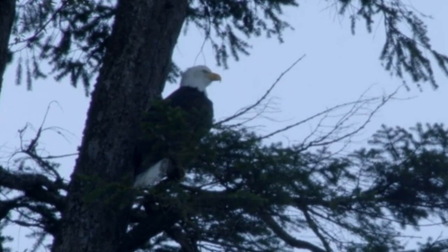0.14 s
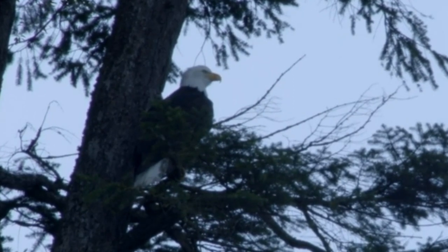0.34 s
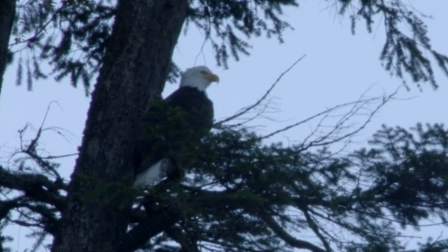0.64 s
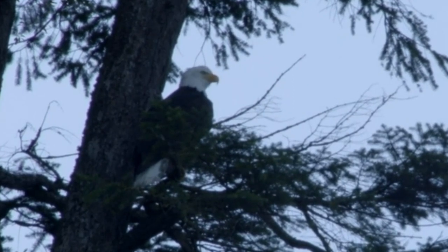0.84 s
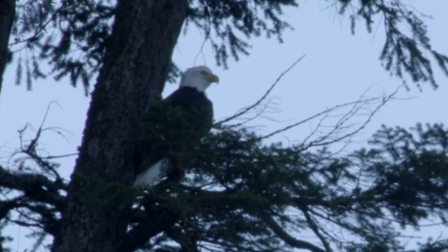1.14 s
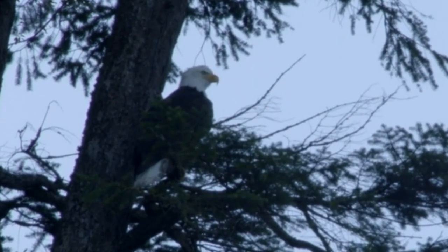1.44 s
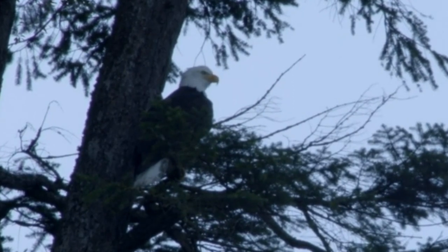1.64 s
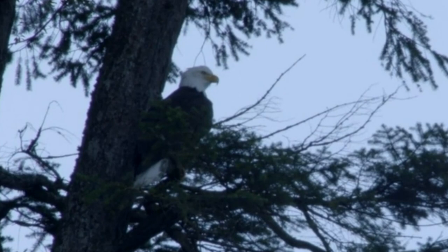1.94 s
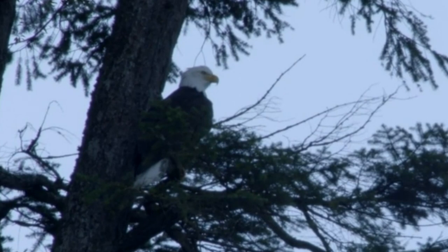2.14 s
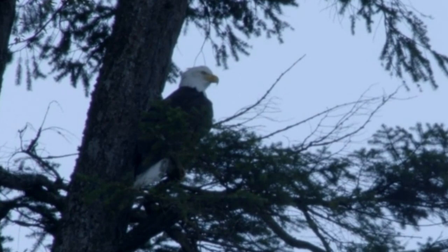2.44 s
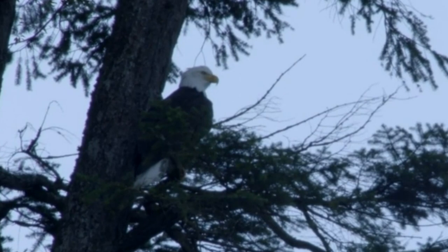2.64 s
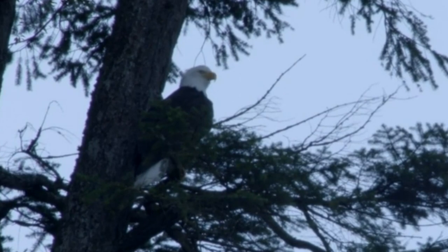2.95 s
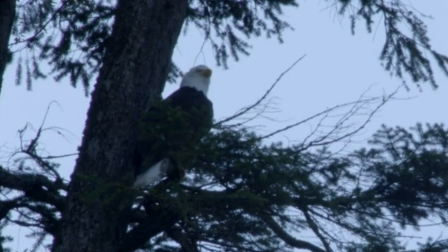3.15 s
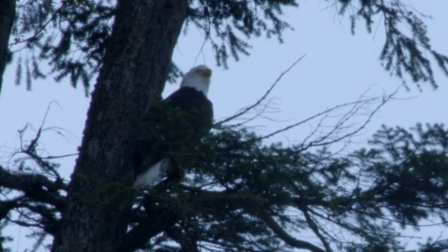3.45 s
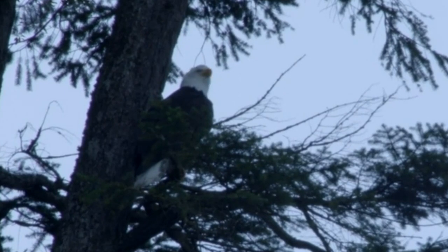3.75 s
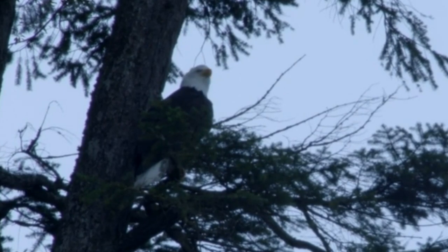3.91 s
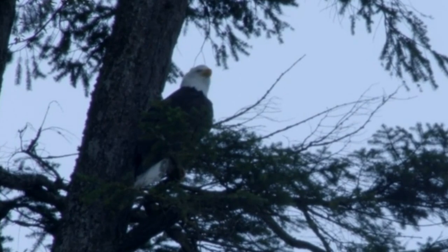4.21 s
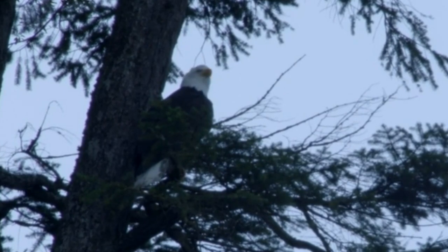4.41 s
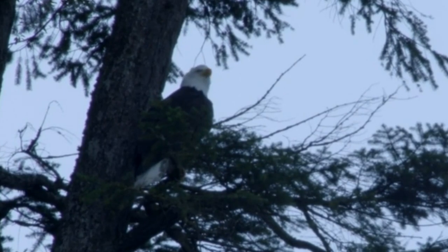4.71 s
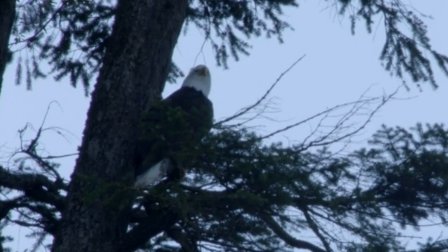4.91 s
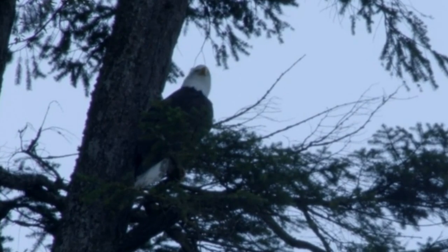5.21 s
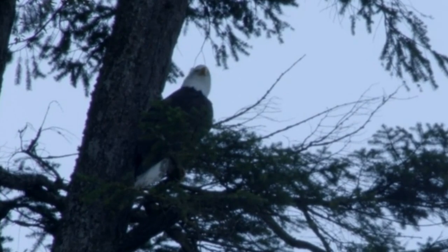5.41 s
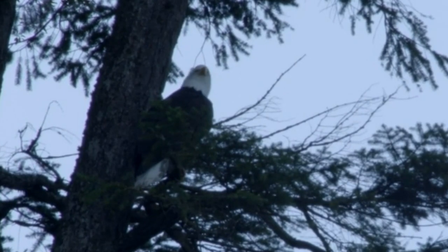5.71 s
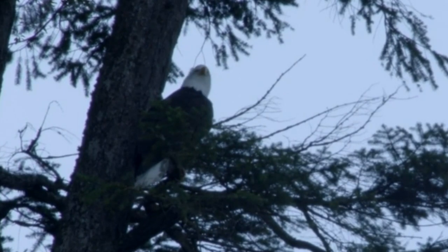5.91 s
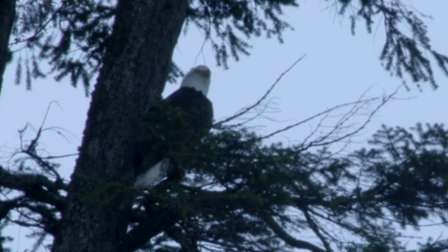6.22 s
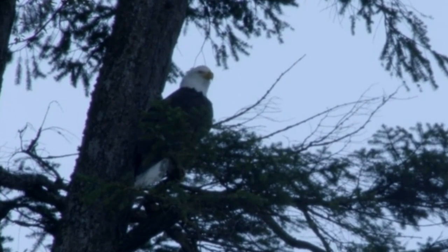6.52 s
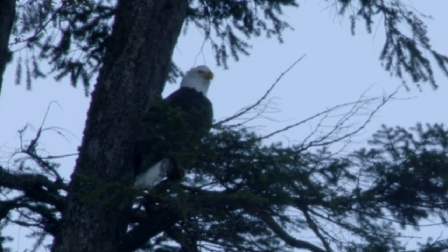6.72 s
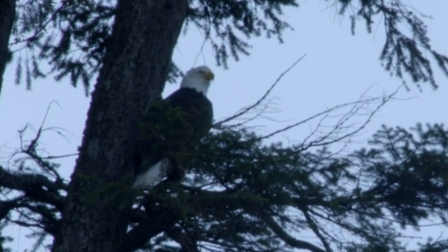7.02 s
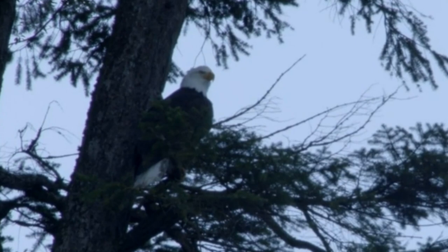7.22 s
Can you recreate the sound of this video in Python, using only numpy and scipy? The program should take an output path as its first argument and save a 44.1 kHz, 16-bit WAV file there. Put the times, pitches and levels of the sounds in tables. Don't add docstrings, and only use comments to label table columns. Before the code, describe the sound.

Quiet dusk woodland with cricket trills, chips and leaf hiss; midway a bird's hoots quicken and an eagle shrieks twice, high and piercing.

```python
import sys
import numpy as np
from scipy import signal
from scipy.fft import rfft, irfft
from scipy.io import wavfile
from scipy.ndimage import uniform_filter1d

SR = 44100
rng = np.random.default_rng(int(sys.argv[2]) if len(sys.argv) > 2 else 0)


def gain_from_db(level_db):
    decades = np.asarray(level_db, float) / 20
    return 10 ** decades


def wav_out(sig):
    wavfile.write(sys.argv[1], SR, np.round(np.clip(np.atleast_2d(sig).T, -1, 1) * 32767).astype(np.int16))


N = 324576
T = np.arange(N) / SR
HZ = np.maximum(np.arange(N // 2 + 1) * SR / N, 1)
SIDES = np.array([[.5], [-.5]])


def unit(x):
    return x / np.sqrt(np.mean(x ** 2))


def walk(rate):
    k = int(SR / rate)
    held = np.repeat(rng.standard_normal(N // k + 1), k)[:N]
    return unit(uniform_filter1d(uniform_filter1d(held, k), k))


def swells(rows):
    return sum(size * np.exp(-((T - s) / length) ** 2) for s, length, size in rows)


def level_swells(rows):
    return swells([(s, length, gain_from_db(db)) for s, length, db in rows])


def band(hz, width):
    return np.exp(-((HZ - hz) / width) ** 2 * 2)


def log_curve(hz, values, *ends):
    return np.interp(np.log(HZ), np.log(hz), values, *ends)


def wide_noise(gain, alike, turn):
    left, other = (rng.standard_normal((2, len(HZ))) + 1j * rng.standard_normal((2, len(HZ)))) * gain
    right = alike * np.exp(1j * turn) * left + np.sqrt(1 - alike ** 2) * other
    return unit(irfft([left, right], N))


def place(x, pan_db, lag_s):
    late = irfft(rfft(x) * np.exp(-2j * np.pi * HZ * lag_s), N)
    return gain_from_db(SIDES * pan_db) * np.array([late, x])


def trees(x, t60, wet_db):
    t = T[:SR // 3]
    tail = rng.standard_normal((2, len(t))) * gain_from_db(-60 * t / t60) * np.clip(t / 0.028, 0, 1)
    tail = unit(tail) / np.sqrt(len(t))
    return gain_from_db(wet_db) * signal.fftconvolve(x[None], tail, axes=1)[:, :N]


def play(rows, wobble):
    s, hz, *columns = np.transpose(rows)
    span = slice(max(int(s[0] * SR), 0), int(s[-1] * SR))
    pitch = uniform_filter1d(np.interp(T[span], s, hz), int(.0021 * SR))
    phase = 2 * np.pi * np.cumsum(pitch * (1 + wobble[span])) / SR
    columns = [np.interp(T[span], s, c) for c in columns]
    edge = np.clip(np.minimum(T[span] - s[0], s[-1] - T[span]) / .002, 1e-3, 1)
    return span, phase, [columns[0] + 20 * np.log10(edge), *columns[1:]]


def notes(events, hz, shape, vary, rough):
    out = np.zeros(N)
    wobble, flutter = rough * .03 * walk(250), 1 + rough * walk(150)
    jogs = rng.standard_normal(len(events))
    for (s, db), top_hz, jog in zip(events, np.broadcast_to(hz, len(events)), jogs):
        rows = [(s + a, top_hz * ratio * (1 + vary * jog), db + d) for a, ratio, d in shape]
        span, phase, (env,) = play(rows, wobble)
        out[span] += gain_from_db(env) * np.sin(phase)
    return out * flutter


# (time [s], pitch [Hz], level [dB])
RISE = [
    [(4.597, 3300, -50), (4.605, 3000, -43), (4.612, 3350, -38), (4.622, 3660, -38), (4.636, 3790, -33),
     (4.655, 3805, -29), (4.668, 3880, -28), (4.683, 3990, -27), (4.693, 4200, -26.5)],
    [(5.59, 2870, -53), (5.6, 3570, -28.5), (5.62, 4600, -35), (5.632, 5650, -39), (5.64, 5930, -40),
     (5.655, 5710, -31.5)],
]
# (time [s], pitch [Hz], level [dB])
UPPER = [
    [(4.699, 4410, -30), (4.71, 4600, -25), (4.722, 4670, -24.5), (4.735, 4680, -28), (4.785, 4920, -30.5),
     (4.815, 4980, -26.5), (4.821, 4950, -42), (4.825, 5250, -37), (4.834, 4550, -38)],
    [(5.678, 5080, -38), (5.72, 5250, -28.5), (5.76, 5350, -25), (5.786, 5230, -26.5), (5.791, 5200, -39),
     (5.796, 5200, -26), (5.802, 4880, -27)],
]
# (time [s], pitch [Hz], level [dB])
LOWER = [
    [(4.731, 4600, -39), (4.748, 4620, -27), (4.79, 4370, -29), (4.817, 4480, -28), (4.822, 3830, -25),
     (4.828, 3500, -18), (4.833, 2460, -32.5), (4.84, 2400, -37), (4.848, 2680, -36)],
    [(5.655, 4860, -39), (5.672, 4490, -31), (5.69, 4130, -32), (5.72, 4225, -32), (5.76, 4450, -27),
     (5.782, 4500, -28), (5.79, 3930, -20), (5.797, 3250, -26), (5.804, 2510, -22)],
]
# (start [s], length [s], top pitch [Hz], level [dB], share of pitch climbed [0-1])
YELPS = [
    (4.832, 0.019, 3870, -19.5, .14),
    (5.8047, 0.016, 3940, -18, .04),
]
# (share of length [0-1], share of climb still to go [0-1], level [dB])
YELP_SHAPE = [(0, 1., -8), (.3, .3, -1), (.75, 0, -4.5), (1, .1, -15)]
# (centre [s], half length [s], roughness [0-1])
FLUTTER = [
    (4.824, .006, .3),
    (4.842, .008, .15),
    (5.648, 0.02, .65),
    (5.798, 0.011, 0.4),
    (5.812, .007, .1),
]
OCTAVE_TOP_DB = [-55.5, -49, -53.5, -40, -60, -54]
SUM_TONE_DB = [-7.5, 5]


def two_voiced_whistle(wobble, rasp, shake):
    octave_under_db, octave_flutter_db = -7, -21
    yelps = [[(s + a * length, hz * (1 - climb * to_go), db + d) for a, to_go, d in YELP_SHAPE]
             for s, length, hz, db, climb in YELPS]
    upper = [rise + whistle for rise, whistle in zip(RISE, UPPER)]
    flutter = 0.097 + swells(FLUTTER)
    octaves, halves = np.zeros(N), []
    for rows, top_db in zip(upper + LOWER + yelps, OCTAVE_TOP_DB):
        span, phase, (db,) = play(rows, wobble)
        rough = flutter[span]
        swing = np.exp(1j * (phase + 1.5 * rough * shake[span]))
        swing = swing * (1 + 0.55 * rough * rasp[span]) / np.sqrt(1 + rough ** 2)
        half = np.zeros(N, complex)
        half[span] = gain_from_db(db) * swing
        halves.append(half)
        octave_db = np.minimum(db + octave_under_db, top_db) + octave_flutter_db * rough
        octaves[span] += gain_from_db(octave_db) * np.imag(swing ** 2)
    sum_tones = sum(gain_from_db(db) * up * low for db, up, low in zip(SUM_TONE_DB, halves[:2], halves[2:4]))
    return octaves + np.imag(sum(halves) + sum_tones)


# (time [s], pitch [Hz], level [dB])
SCREAM = [
    [(4.848, 3410, -30), (4.853, 3300, -22.5), (4.859, 3220, -17), (4.87, 3140, -17.5), (4.88, 3118, -15),
     (4.906, 3080, -14.5), (4.924, 3033, -13.5), (4.933, 2980, -15), (4.942, 2943, -13.5)],
    [(5.817, 3470, -26), (5.824, 3360, -19.5), (5.834, 3260, -13.5), (5.842, 3250, -13), (5.863, 3205, -9),
     (5.876, 3140, -10.5), (5.894, 3148, -10.5), (5.92, 3128, -12), (5.934, 3100, -13)],
]
# (time [s], pitch [Hz], level [dB])
FALL = [
    [(4.948, 2790, -15), (4.956, 2600, -15), (4.964, 2550, -17), (4.98, 2424, -22.5), (4.985, 2533, -26),
     (4.992, 2390, -19.5), (5.002, 2224, -26.5), (5.012, 2060, -35), (5.024, 1910, -45)],
    [(5.942, 3027, -15), (5.948, 2950, -14.5), (5.954, 2730, -14), (5.961, 2517, -14.5), (5.968, 2430, -19),
     (5.973, 2380, -32), (5.978, 2380, -21), (5.986, 2220, -25.5), (5.996, 1980, -42)],
]
# (octave re pitch [dB], third partial re pitch [dB], pitch under which the period doubles [Hz],
# half pitch re doubling [dB], octave gain as the note sags [dB])
SCREAM_COLOUR = [
    (-25, -39, 2614, -6, 12.3),
    (-18.5, -25.5, 2570, -8, 5.7),
]
OCTAVE_DIP_DB = [-10, 0]
# (delay [s], level [dB])
BRANCHES = [(.009, -12), (.016, -18), (.026, -21), (.039, -26)]


def locked_scream(wobble, rasp, shake):
    early_from_s, early_to_s, early_db = 5.881, 5.949, -19.5
    early = gain_from_db(early_db) * np.clip(np.minimum(T - early_from_s, early_to_s - T) / 0.0054, 0, 1)
    out = np.zeros(N)
    for held, fall, colour, dip_db in zip(SCREAM, FALL, SCREAM_COLOUR, OCTAVE_DIP_DB):
        octave_db, third_db, break_hz, half_db, gain_db = colour
        span, phase, (db, hz) = play([(s, f, d, f) for s, f, d in held + fall], wobble)
        resonance = np.maximum(np.exp(-((hz - 2600) / 230) ** 2), .55 * (hz < 2600))
        dip = np.exp(-((hz - 2940) / 80) ** 2)
        octave_db = octave_db + gain_db * resonance + dip_db * dip
        third_db = third_db - 21.5 * np.abs(3010 - hz) / 1000
        sag = break_hz - hz
        failing = gain_from_db(-12.5 + 16 * sag / 1000) * np.clip(sag / 60, 0, 1)
        unrest = .4 * np.minimum(failing, 1)
        phase = phase + unrest * shake[span]
        half_fade = np.clip((hz - 2150) / 150, .2, 1)
        half = np.sin(3 * phase / 2) + gain_from_db(half_db) * half_fade * np.sin(phase / 2)
        half = half + gain_from_db(-21) * np.sin(5 * phase / 2)
        tone = np.sin(phase) + gain_from_db(octave_db) * np.sin(2 * phase) + gain_from_db(third_db) * np.sin(3 * phase)
        voice = gain_from_db(db) * (1 + unrest * rasp[span]) * (tone + (early[span] + failing) * half)
        direct, turned = np.zeros(N), np.zeros(N)
        direct[span], turned[span] = voice, np.clip((3010 - hz) / 150, 0, 1)
        fall_end_s = fall[-1][0]
        turned = np.maximum(turned, (T > fall_end_s - .01) & (T < fall_end_s + .05))
        out += direct + turned * sum(gain_from_db(d) * np.roll(direct, int(s * SR)) for s, d in BRANCHES)
    return out


def eagle():
    wobble, rasp, shake = .001 * walk(300), walk(900), walk(1500)
    voice = two_voiced_whistle(wobble, rasp, shake) + locked_scream(wobble, rasp, shake)
    top_limit = signal.ellip(8, .2, 50, 11000, fs=SR, output="sos")
    return np.sqrt(2) * signal.sosfilt(top_limit, voice)


# (time [s], peak level [dB])
HOOTS = [(4.478, -42), (4.672, -38.5), (4.871, -33.5), (5.035, -34), (5.19, -32.5), (5.3323, -32.5),
         (5.471, -31.5), (5.613, -31), (5.7416, -30.5), (5.875, -31), (5.9981, -29), (6.118, -29),
         (6.232, -28.5), (6.34, -29.5), (6.448, -29.5), (6.5491, -29), (6.6518, -29.5), (6.752, -30.5),
         (6.8526, -31), (6.9497, -32), (7.0471, -31.5), (7.1359, -48)]
# (time [s], pitch ratio [1], level [dB])
HOOT_SHAPE = [(-.004, 1.22, -9), (.001, 1.09, -2.5), (.007, 1.005, 0), (.014, .945, -1), (.022, .84, -8)]
# (time [s], pitch ratio [1], level [dB])
HOOT_END = [(.015, .87, -8), (.023, .75, 0), (.031, .68, -3.5), (.041, .59, -25)]


def hooting_bird():
    pitch_hz, end_db, end_db_per_s = 1423.6, -18.5, 6.5
    calls = np.array(HOOTS)
    endings = calls.copy()
    endings[:, 1] += end_db + end_db_per_s * (calls[:, 0] - calls[0, 0])
    tops = notes(calls, pitch_hz, HOOT_SHAPE, 0.016, 0.15)
    ends = notes(endings, pitch_hz, HOOT_END, 0.019, .15)
    hoots = tops + ends
    echo = gain_from_db(-13.5) * np.roll(hoots, int(.038 * SR))
    return place(hoots, -9, 0.00015) + trees(tops + gain_from_db(-2.5) * ends, 0.45, -5) + echo


# (time [s], peak level [dB], top pitch [Hz])
CHIPS = [(0.022, -31, 4110), (0.371, -29, 4170), (0.793, -28, 4240), (1.284, -30, 4330),
         (6.411, -31.5, 4280), (6.7337, -30, 4320), (7.1322, -32, 4380)]
# (time [s], pitch ratio [1], level [dB])
CHIP_SHAPE = [(-.028, .76, -32), (-.012, .88, -21), (-.004, .97, -10), (.001, 1., -6), (.01, .96, -8),
              (.017, .9, -19), (.036, .76, -25), (.055, .7, -31)]


def small_bird():
    chips = np.array(CHIPS)
    return notes(chips[:, :2], chips[:, 2], CHIP_SHAPE, 0, .2)


# (first click [s], gap [s], peak level [dB], change per click [dB])
CROAK = [
    (0.017, 0.04, -36, -3),
    (.345, .01, -40, -1),
    (3.584, .042, -35.5, -0.3),
    (4.563, 0.039, -40, 0.57),
]
CROAK_CLICKS = [2, 2, 7, 7]
# (frequency [Hz], level [dB], decay time t60 [s])
FROG_SAC = [(810, -6, 0.039), (1130, 5, 0.02), (1600, 2.5, .015), (2036, 0, 0.034), (2600, -1.5, 0.021),
            (3140, -5, 0.021)]


def frog():
    out, t = np.zeros(N + 2000), T[:2000]
    clicks = [(s + k * gap, db + k * step)
              for (s, gap, db, step), count in zip(CROAK, CROAK_CLICKS) for k in range(count)]
    for (s, db), turns in zip(clicks, rng.random((len(clicks), len(FROG_SAC)))):
        ring = sum(gain_from_db(d - 60 * t / t60) * np.sin(2 * np.pi * (hz * t + turn))
                   for (hz, d, t60), turn in zip(FROG_SAC, turns))
        out[int(s * SR):][:2000] += gain_from_db(db + 3.5) * ring * np.clip(t / 0.002, 0, 1)
    return out[:N]


# (time [s], peak level [dB])
BLIP = [(1.62, -36.5)]
# (time [s], pitch ratio [1], level [dB])
BLIP_SHAPE = [(-.004, 0.99, -12), (.003, 0.98, 1.5), (.011, 1, 1), (.02, .99, -14)]


def blip():
    return place(notes(BLIP, 1410, BLIP_SHAPE, 0, .1), 13, -0.00019)


# (time [s], peak level [dB])
PEEPS = [(1.3104, -41), (1.4885, -37.5), (1.5469, -44), (1.645, -45), (1.705, -38.5), (3.3498, -36.5),
         (3.5374, -37), (3.7514, -37), (5.1357, -39.5), (5.3213, -38), (6.75, -44), (7.007, -39.5),
         (7.1931, -38.5)]
# (time [s], pitch ratio [1], level [dB])
PEEP_SHAPE = [(-.006, 1, -20), (.004, 1, -2), (.02, 1, -5), (.035, 1, -14), (.09, 1, -23)]


def tree_cricket():
    return place(notes(PEEPS, 3460, PEEP_SHAPE, 0.0022, 0.17), 5.3, -0.000042)


def trills(songs, strokes_hz, sharp):
    onset_s, warm_s, stop_s = .03, .17, 0.019
    out, wobble = np.zeros(N), 0.003 * walk(60)
    pulse = np.maximum(np.sin(np.pi * strokes_hz * T) ** 2 - .1, 0) ** sharp
    stroke = unit(pulse) * gain_from_db(1.7 * walk(40))
    for start, end, hz, db in songs:
        cold_hz, cold_db = hz * .968, db - 8
        rows = [(start - onset_s, cold_hz, cold_db - 14), (start, cold_hz, cold_db),
                (start + warm_s, hz, db), (end - stop_s, hz, db), (end, hz, db - 13)]
        span, phase, (env,) = play(rows, wobble)
        out[span] += np.sqrt(2) * gain_from_db(env) * stroke[span] * np.sin(phase)
    return out


# (start [s], end [s], wing pitch [Hz], level [dB])
CRICKET = [(0.44, 1.29, 6220, -44), (1.96, 2.73, 6210, -43.5), (3.745, 4.335, 6225, -43.5),
           (5.25, 5.83, 6210, -44), (6.74, 7.4, 6226, -43.5)]
# (start [s], end [s], wing pitch [Hz], level [dB])
FAR_CRICKET = [(0.82, 1.25, 5710, -47), (2.3, 2.75, 5750, -44.5)]


def crickets():
    near = place(trills(CRICKET, 54.5, 0.7), 5.9, -0.00001)
    return near + place(trills(FAR_CRICKET, 53.6, 0.45), 0, -0.000034)


# (start
# [s], length [s], first pitch [Hz], last pitch [Hz], level [dB])
FAR_AHEAD = [(.078, .022, 3650, 4050, -46), (.106, .024, 4400, 2800, -44), (.126, .025, 2800, 3250, -48),
             (.145, .03, 4150, 4250, -47), (.178, .022, 2700, 3050, -46), (.198, .045, 3000, 2950, -47),
             (.07, .045, 1830, 1960, -53), (.105, .225, 1990, 1970, -52), (.215, .04, 3950, 4000, -50),
             (.352, .035, 1300, 1350, -49), (.325, .02, 1550, 1550, -50), (.47, .03, 1250, 1250, -51),
             (3.575, .035, 1900, 1900, -47), (3.36, .07, 2550, 2550, -54), (1.45, .05, 6100, 6000, -49),
             (6.02, .068, 3150, 3130, -47), (4.61, .09, 10100, 10500, -66)]
# (start [s], length [s], first [Hz], last [Hz], level [dB])
FAR_LEFT = [(.82, .14, 8000, 8150, -55), (.95, .1, 7800, 7500, -56), (1.68, .2, 7600, 7450, -57),
            (2.5, .3, 7800, 7800, -60), (6.49, .14, 8200, 8350, -55), (6.65, .1, 7900, 7750, -56),
            (7.32, .04, 7700, 7600, -54)]
# (start [s], length [s], first [Hz], last [Hz], level [dB])
FAR_RIGHT = [(7.172, .035, 1950, 1350, -50), (7.153, .035, 980, 900, -46)]
FAR_PAN_DB = [4.5, 15, -9]
# (time [s], half length [s], level [dB])
FLOCK = [(0.134, 0.099, -44), (0.373, .03, -49), (2.398, 0.12, -44), (3.0, 0.1, -48.5), (4.42, 0.074, -50)]
# (time [s], half length [s], level [dB])
LOW_FLOCK = [(.15, 0.08, -46), (0.388, 0.056, -48.5), (.84, .04, -49), (6.45, 0.04, -48)]


def far_birds():
    out, wobble, flutter = np.zeros((2, N)), .006 * walk(200), 1 + .3 * walk(120)
    for calls, pan_db in zip([FAR_AHEAD, FAR_LEFT, FAR_RIGHT], FAR_PAN_DB):
        for s, length, first_hz, last_hz, db in calls:
            rows = [(s + k * length, first_hz + k * (last_hz - first_hz), db + d)
                    for k, d in [(0, -9), (.2, 0), (.7, -2), (1, -9)]]
            span, phase, (env,) = play(rows, wobble)
            whistle = np.sqrt(2) * gain_from_db(env) * flutter[span] * np.sin(phase)
            out[:, span] += gain_from_db(SIDES * pan_db) * whistle
    flock = wide_noise(band(4300, 600), 0.21, 0) * level_swells(FLOCK) * gain_from_db(1.5 * walk(60))
    low_flock = wide_noise(band(3250, 600), 0.47, 0) * level_swells(LOW_FLOCK) * gain_from_db(2.3 * walk(60))
    return out + trees(out.mean(axis=0), 0.13, -4) + flock + low_flock


# (centre [Hz], width [Hz], level [dB], left minus right [dB])
CHORUS = [(4143, 110, -54, -5.5), (4380, 170, -59, 7.5), (4670, 250, -50, 1), (5430, 270, -46, 1),
          (5840, 440, -49.5, -8), (6961, 355, -43, 1), (8020, 400, -62.5, 1)]
# (time [s], half length [s], level [dB])
KATYDIDS = [(.55, 0.4, -59.5), (1.863, 0.28, -60.5), (3.07, 0.39, -58), (4.438, 0.22, -59),
            (5.6, 0.38, -63), (6.2, 0.44, -63), (7.4, 0.5, -62)]


def insect_chorus():
    out = np.zeros((2, N))
    for hz, width, db, pan_db in CHORUS:
        flicker_db = .6 * walk(1.5) + 1.5 * walk(12) + 1.5 * walk(70)
        out += wide_noise(band(hz, width), 0.31, -2.18) * gain_from_db(db + flicker_db + SIDES * pan_db)
    katydids = wide_noise(band(8700, 700), 0.72, -2.0) * gain_from_db(1.5) * level_swells(KATYDIDS)
    return out + katydids


# (frequency [Hz], level per Hz [dB], left minus right [dB])
WOOD = [(60, -16.5, -3), (250, -20.5, 3), (450, -13, -2), (790, -1, 2.5), (1310, 0.5, 1.5), (2460, -3, 0),
        (3120, -2.5, -1), (4500, -4, 0.5), (6760, -3.5, 13), (7575, -5.5, 1), (8450, -48.5, -5),
        (9700, -28.5, 3), (10600, -24.5, 1), (13200, -31.5, 0)]
# (time [s], half length [s], level change [dB])
HISS_SHIFTS = [(0.0, 0.19, 0), (1.2, 0.15, 1), (1.55, 0.18, 1.5), (2.55, 0.43, 1), (2.72, 0.11, -1.5),
               (3.77, 0.078, 0), (4.15, .1, 3), (4.85, 0.32, 2.5), (5.95, 0.45, 2.5)]


def leaves():
    hz, db, pan_db = np.transpose(WOOD)
    hiss = wide_noise(gain_from_db(log_curve(hz, db)) * (HZ < 14300), 0.16, -2.2)
    tilt = gain_from_db(SIDES * log_curve(hz, pan_db))
    return irfft(rfft(hiss) * tilt, N) * gain_from_db(14.5 - 57.5 + swells(HISS_SHIFTS) + 1.57 * walk(8))


RUSH_FROM_S = 1.28
# (frequency [Hz], level per Hz [dB])
RUSH = [(15, -47), (25, -15), (60, -3), (344, -8), (460, -12), (555, 0), (648, -5), (1400, -4.5),
        (1500, -30.5), (1950, -42), (3300, -120)]
# (time [s], half length [s], level change [dB])
RUSH_SWELL = [(2.4, 1, 2)]


def low_rush():
    hz, db = np.transpose(RUSH)
    low_db = log_curve(hz, db, -80, -80) - 4.9 * np.log2(1 + HZ / 700)
    low = wide_noise(gain_from_db(low_db), 0.99, 0)
    hollow = wide_noise(band(560, 90), 0.86, -.5) * gain_from_db(-9.5 + 2.0 * walk(10) + SIDES * 3)
    return (low + hollow) * gain_from_db(-51.5 + swells(RUSH_SWELL)) * (T > RUSH_FROM_S)


# (time [s], half length [s], level [dB])
RUMBLE = [(1.8, 0.37, -57), (2.6, 0.36, -55.5)]


def rumble():
    return wide_noise(band(52.4, 24), 1.0, 0) * level_swells(RUMBLE) * (T > RUSH_FROM_S)


def scene():
    bird = eagle()
    out = bird + trees(bird, .15, -27).mean(axis=0) + hooting_bird()
    chips, croak = small_bird(), frog()
    out += place(chips, -6, .00005) + place(croak, 8.6, -0.00028)
    out += trees(chips + gain_from_db(-4.5) * croak, 0.3, -2)
    out += blip() + tree_cricket() + crickets() + far_birds()
    return out + insect_chorus() + leaves() + low_rush() + rumble()


def top_cut(x):
    return signal.sosfilt(signal.butter(12, 15030, fs=SR, output="sos"), x)


def record(dry):
    return top_cut(dry)


dry = scene()
out = record(dry)
wav_out(out)
```